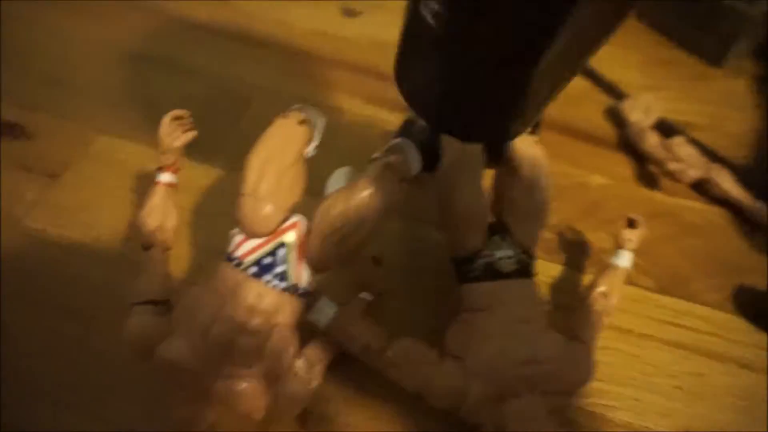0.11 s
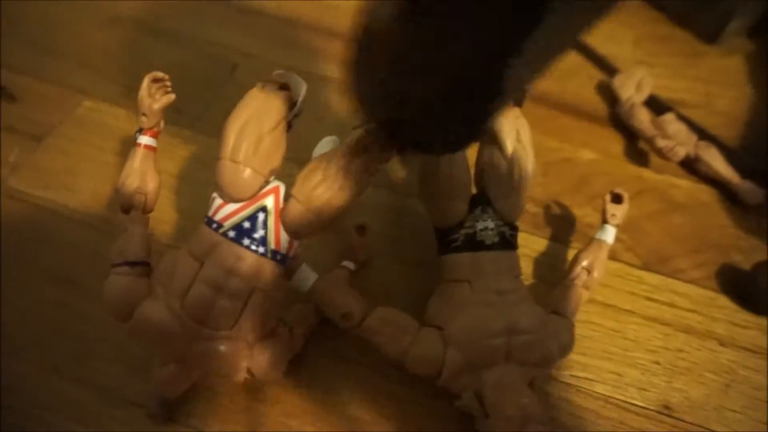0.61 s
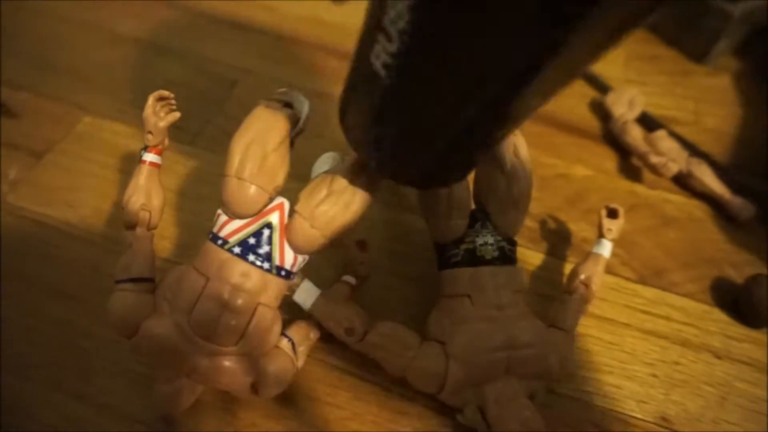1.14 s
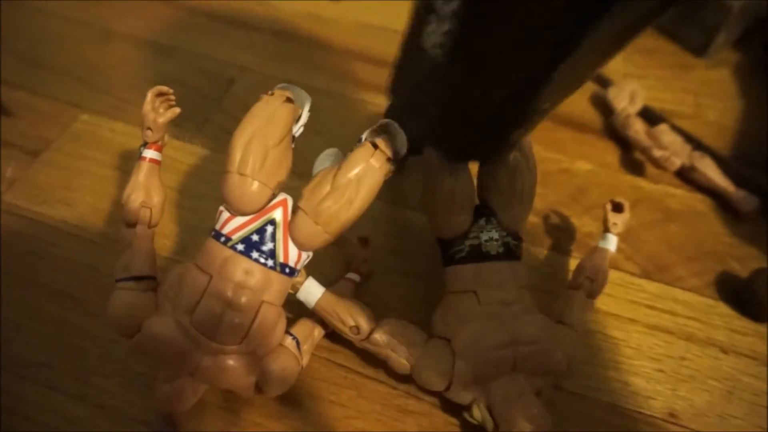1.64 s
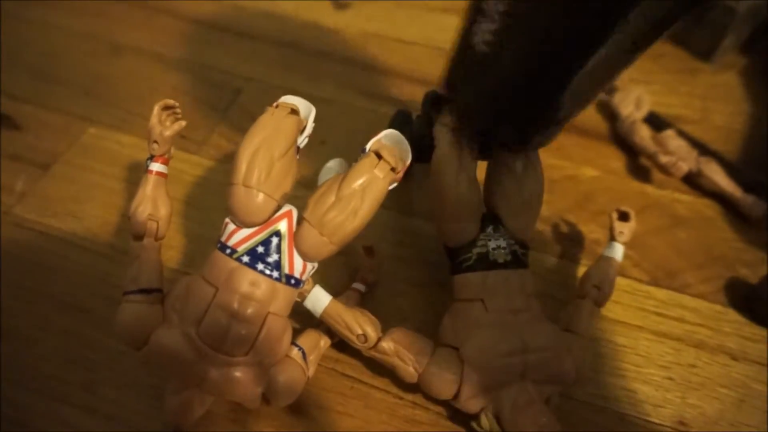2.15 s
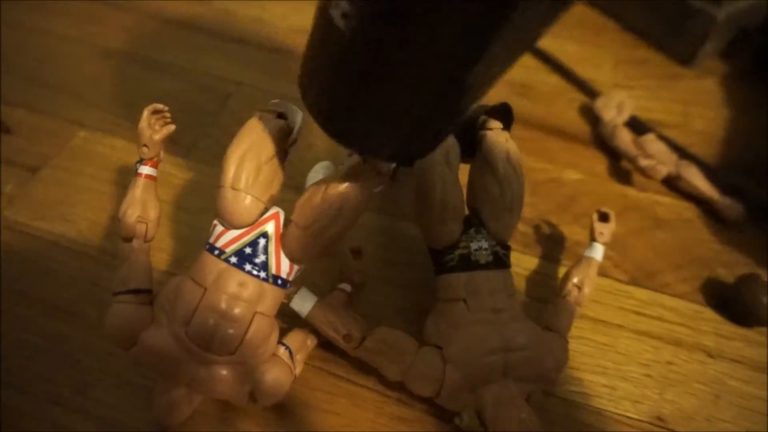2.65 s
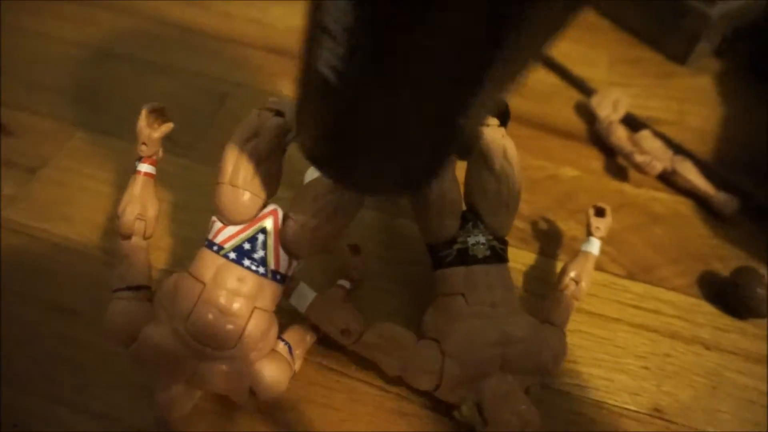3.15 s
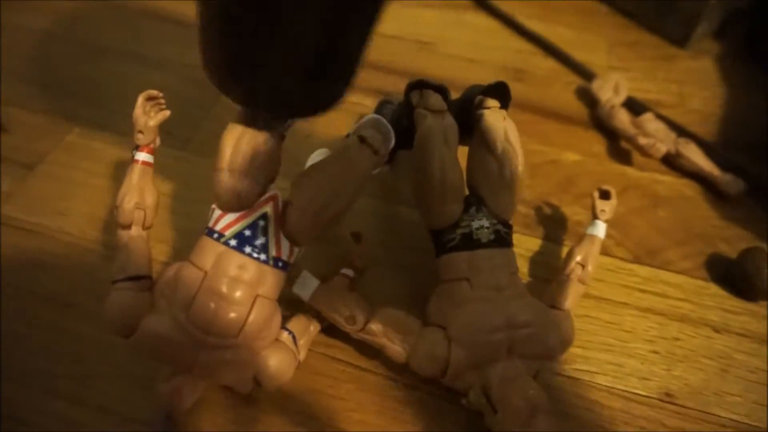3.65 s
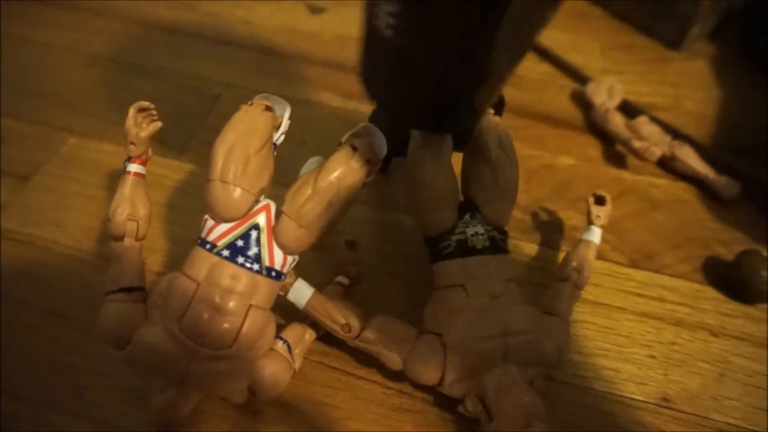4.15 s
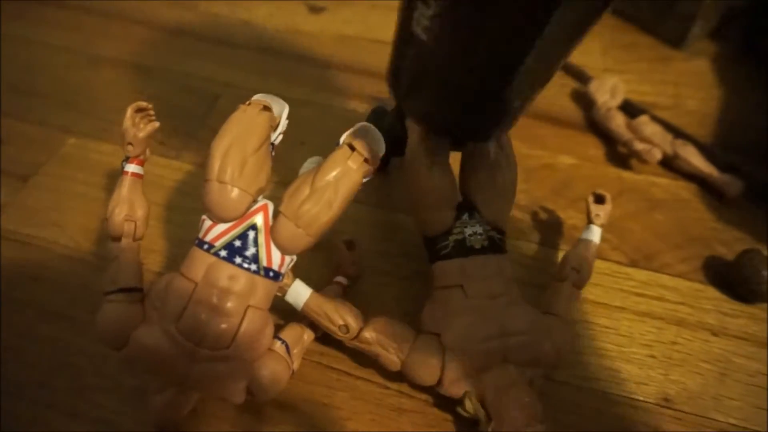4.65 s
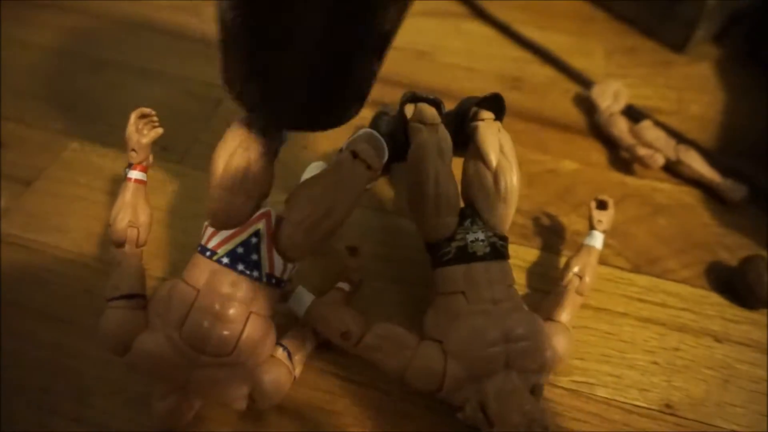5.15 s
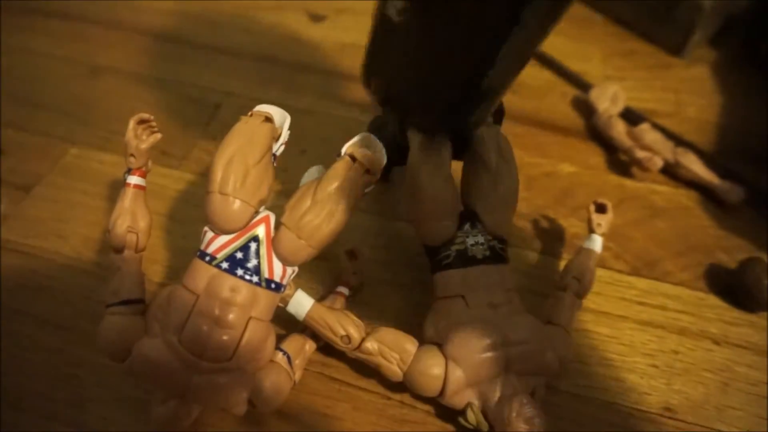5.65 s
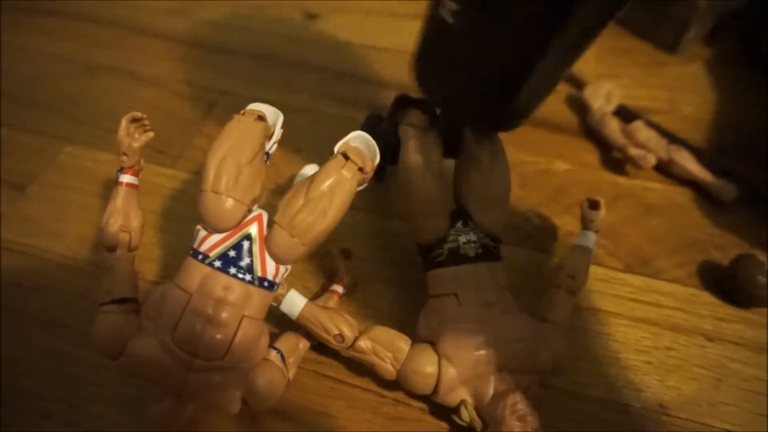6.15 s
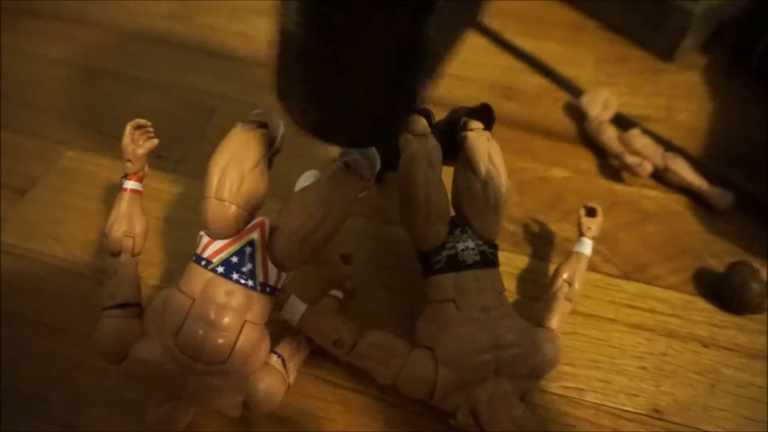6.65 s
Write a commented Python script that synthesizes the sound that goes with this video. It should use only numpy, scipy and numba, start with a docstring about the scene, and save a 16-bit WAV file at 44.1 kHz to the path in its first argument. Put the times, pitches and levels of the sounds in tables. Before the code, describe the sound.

A handheld hair dryer runs steadily up close, a loud rush of air over an even motor whine, gently fluttering as it is waved about.

```python
"""A hand-held hair dryer is waved over a wooden floor just in front of a stereo microphone pair.
Its rush is turbulent noise, filtered by the resonances of the barrel and split into gusting half-octave bands.
Two narrow bands of noise ring at the nozzle; sines at multiples of the shaft speed make the whine of
shaft and five fan blades, and steady sines a faint hum. Short echoes of the air come from nearby surfaces.
As the hand sweeps, level, brightness, the nozzle resonance and the side it is heard from all drift."""
import sys
import numpy as np
from scipy import signal
from scipy.fft import rfft, irfft, next_fast_len
from scipy.io import wavfile
from scipy.ndimage import uniform_filter1d, map_coordinates
from numba import njit

SR = 44100
rng = np.random.default_rng(int(sys.argv[2]) if len(sys.argv) > 2 else 0)


def level_to_linear(level):
    """Convert decibel levels to linear amplitude factors, elementwise."""
    exponent = np.asarray(level, float) / 20
    return 10 ** exponent


def wav_out(sig):
    """Save sig, one row per channel (or a flat mono array), as 16-bit PCM at SR to the path in sys.argv[1]."""
    wavfile.write(sys.argv[1], SR, np.round(np.clip(np.atleast_2d(sig).T, -1, 1) * 32767).astype(np.int16))


N = 298557  # samples
LEFT_RIGHT = np.array([[1], [-1]])  # sign of a difference in the left and the right channel


def level(x, db):
    """Root-mean-square normalisation: scale to an rms level in dB."""
    return x * level_to_linear(db) / np.sqrt(np.mean(x ** 2))


def curve(table):
    """Linear interpolation in time: each column after the seconds becomes one value a sample."""
    seconds, *columns = np.transpose(table)
    time = np.arange(N) / SR
    return [np.interp(time, seconds, column) for column in columns]


def along(table, hz):
    """Interpolation on a logarithmic frequency axis of an (Hz, value) table."""
    table_hz, value = np.transpose(table)
    return np.interp(np.log(hz + 1), np.log(table_hz + 1), value)


def bumps(table):
    """Superposition of smooth flat-topped swells from (middle s, length s, dB) rows."""
    time = np.arange(N) / SR
    return sum(db * np.exp(-(2 * np.abs(time - middle) / length) ** 3) for middle, length, db in table)


def walk(rate_hz):
    """Band-limited random drift: levels drawn rate_hz times a second, averaged twice; spread near 1."""
    hold = int(SR / rate_hz)
    steps = np.repeat(rng.standard_normal(N // hold + 1), hold)
    return 1.38 * uniform_filter1d(uniform_filter1d(steps, hold), hold)[:N]


@njit
def svf(x, hz, width):
    """State-variable resonator: a band-pass with a moving centre, gain 1 there."""
    out, band, low = np.empty(len(x)), 0., 0.
    for i in range(len(x)):
        g, damping = np.tan(np.pi * hz[i] / SR), width / hz[i]
        v = (band + g * (x[i] - low)) / (1 + g * (g + damping))
        band, low, out[i] = 2 * v - band, low + 2 * g * v, damping * v
    return out


def flutter():
    """Narrow-band modulation: an uneven wobble around 8.5 Hz, 9.5 Hz wide, with a spread of 1."""
    return level(svf(rng.standard_normal(N), np.full(N, 8.5), 9.5), 0)


# Steady hum tones. Each row: frequency in Hz, mean level in dB rms.
HUM_TONES = [(110.1, -64.5), (240.2, -66.5), (439.8, -51)]


def hum():
    """Pure tones of fixed frequency, slowly wavering in level and the same in both channels."""
    time = np.arange(N) / SR
    out = 0
    for hz, db in HUM_TONES:
        out = out + np.sqrt(2) * level_to_linear(db + 1.1 * walk(1.53)) * np.sin(2 * np.pi * hz * time)
    return out


# Reflections from floor, hands and furniture nearby. Each row: mean delay in ms,
# level in dB against the treble of the direct sound.
ECHOES = [(1.2, -16), (2.3, -18), (3.4, -14.5), (4.7, -18.5), (6.4, -19.5), (7.9, -22)]


def nearby(x):
    """Comb filtering: short echoes whose paths stretch as the dryer moves shift a fine treble ripple."""
    # small objects return only the short wavelengths
    high_pass = signal.butter(4, 3700, "high", fs=SR, output="sos")
    treble = signal.sosfilt(high_pass, x.mean(axis=0))
    out = x.copy()
    for delay_ms, db in ECHOES:
        lag = (delay_ms + 0.072 * walk(2.5)) * SR / 1000
        out += level_to_linear(db) * map_coordinates(treble, [np.arange(N) - lag], order=2, mode="mirror")
    return out


# Pitch of the upper nozzle ring. Each row: time in seconds, frequency in Hz.
RING_PITCH = [(0, 6200), (3, 6280), (5.4, 6060), (5.7, 6020), (6.1, 6220), (6.77, 5870)]
# Times at which the gap to the floor suits the ring. Each row: middle in seconds, length in seconds, lift in dB.
RING_LIFT = [(2.0, .5, 5), (3.1, .9, 9), (6.0, 1.3, 13)]


def ring(noise, hz):
    """Resonance: two equal 450 Hz wide band-passes in series."""
    return svf(svf(noise, hz, 450.), hz, 450.)


def nozzle():
    """Resonance of air between nozzle and floor: two hisses rise together when the gap suits them."""
    rest_db = -1.5  # added to both hisses throughout
    out = 0
    for hz, db in [(curve(RING_PITCH)[0], -40), (np.full(N, 3880.), -42.5)]:
        shared, opposed = rng.standard_normal((2, N))
        hiss = ring(shared, hz) + .25 * LEFT_RIGHT * ring(opposed, hz)
        out = out + level(hiss, db)
    return out * level_to_linear(rest_db + bumps(RING_LIFT))


# Motor and fan tones. Each row: multiple of shaft speed, mean level in dB rms, left minus right in dB,
# phase by which left leads in radians.
WHINE_TONES = [(1, -30, 3.5, 0.29), (2, -36, -5, .17), (3, -34, .1, .12), (5, -33, -4, -.37),
               (8, -52, -3, .25), (15, -50, -1.2, -.1), (21, -47, -.6, -.3)]
# Fan speed. Each row: time in seconds, blade-passing frequency in Hz.
FAN_SPEED = [(0, 2649.5), (.35, 2649.6), (1.0, 2655.6), (1.35, 2654.9), (2.4, 2660.8), (3.3, 2649.5),
             (4.0, 2654.3), (4.4, 2651.7), (5.1, 2651.7), (5.75, 2656.6), (6.1, 2655.2), (6.4, 2659),
             (6.77, 2657)]
# Swing of the shaft tone, used about its mean. Each row: time in seconds, level in dB.
SHAFT_LEVEL = [(0.02, -30), (0.41, -35), (0.82, -31.5), (2.0, -35), (2.6, -33.5), (2.82, -30), (3.9, -32.5),
               (3.96, -36), (4.22, -31.5), (4.27, -34), (4.57, -32), (4.76, -37), (4.8, -35), (5.1, -31),
               (5.88, -36), (6.72, -31)]


def whine():
    """Harmonics of rotation: multiples of the shaft speed, the shaft tone swinging most in level."""
    blades, faint_db, upper_share = 5, -59, 0.25  # upper_share: how far the higher tones follow the shaft tone
    shaft_db = curve(SHAFT_LEVEL)[0]
    shaft_db = shaft_db - shaft_db.mean()
    shaft_hz = curve(FAN_SPEED)[0] / blades + 0.15 * walk(24.66)
    turns = np.cumsum(shaft_hz) / SR
    # faint tones fill in the other multiples from 6 to 28
    listed = np.round([row[0] for row in WHINE_TONES])
    faint = [(k, faint_db, 0, 0) for k in range(6, 29) if k not in listed]
    out = 0
    for multiple, db, pan_db, lead in list(WHINE_TONES) + faint:
        start_phase = rng.uniform(0, 2 * np.pi)
        tone = np.sin(2 * np.pi * round(multiple) * turns + LEFT_RIGHT * lead / 2 + start_phase)
        # shorter waves waver more as the paths shift
        waver_db = .45 * np.sqrt(multiple) * walk(3.)
        swing_db = shaft_db * (1 if multiple < 1.5 else upper_share)
        out = out + np.sqrt(2) * level_to_linear(db + LEFT_RIGHT * pan_db / 2 + waver_db + swing_db) * tone
    return out


# Slow drift of the rush. Each row: time in seconds, body in dB, treble in dB, left minus right of the treble in dB.
DRIFT = [(0, 0.5, -0.5, 0), (.5, 0.8, -.6, -3.5), (.85, 0.4, -1.0, -1), (1.3, 0.8, -0.9, -1.5),
         (1.7, 1, 0.1, -1.8), (2.05, -0.2, 0, -2), (2.4, -0.3, -.8, -1.8), (2.95, 2.1, 0.6, -1),
         (3.3, 0.5, -.6, -0.5), (3.68, 1.1, .6, 0.5), (4.1, 0.2, 0.8, -0.7), (4.51, 1.5, 1.6, -0.8),
         (4.7, -0.1, 1.1, -1.2), (5.1, 0.8, -0.1, 1.1), (5.55, -.7, -0.4, -0.3), (6.1, 0.1, 1.0, -0.8),
         (6.4, 1, .9, -1), (6.77, 1.7, 1, .5)]
# Brief dips in level of the whole rush. Each row: middle in seconds, length in seconds, depth in dB for the body.
DIPS = [(.28, .1, -0.6), (.6, 0.065, -0.3), (1.93, 0.13, -0.9), (2.65, 0.05, -1.1), (3.19, 0.16, -1.5),
        (4.02, 0.14, -1), (4.75, 0.19, -1.1), (5.31, 0.08, -2), (6.27, 0.12, -2)]


def sweep():
    """Directivity of a moving source: levels of body and treble and the turn to the left, all in dB."""
    body_db, treble_db, turn_db = curve(DRIFT)
    dip_db = bumps(DIPS)
    # dips cut the treble deeper than the body
    return body_db + dip_db, treble_db + 1.48 * dip_db, turn_db


# Spectrum of the air without its resonances. Each row: frequency in Hz, relative density in dB per Hz.
AIR = [(20, -64), (100, -34.5), (320, -22), (370, -15.5), (830, -12.5), (1030, -7.5), (1750, -10.5),
       (3500, -13), (4700, -17.5), (6350, -20), (6700, -21), (12300, -21.5), (13100, -18), (15700, -20)]
# Barrel resonances and valleys. Each row: frequency in Hz, width in Hz, lift or dip in dB.
BARREL = [(482, 53, -2.5), (1080, 22, 5.5), (1177, 85, 7.5), (1360, 297, 7.5), (1578, 102, 4.5),
          (2086, 100, 4.5), (2317, 124, 5), (2560, 130, -2.5), (3020, 400, 6), (5640, 690, 7),
          (14600, 1200, 2.5)]
# Level difference of the microphone pair. Each row: frequency in Hz, left minus right in dB.
LEAN = [(60, 0.0), (110, 0.0), (200, 0.5), (380, 0.5), (700, 2.0), (1290, -0.5), (2380, -2.0), (4400, -2.0),
        (8120, -0.5), (15000, -0.5)]
# Phase difference of the microphone pair. Each row: frequency in Hz, phase by which left leads in radians.
LEAD = [(0, 0), (85, 0), (520, 0.2), (860, 0.1), (2240, 0.0), (2670, -0.2), (3360, 0.5), (3620, 0.0),
        (4650, 0.0), (8700, -0.2), (9650, -0.6), (11700, -0.5), (12700, -0.8), (13700, -0.8), (15500, -1.4)]
# Sound returned by floor and room. Each row: frequency in Hz, level in dB against the direct rush.
DIFFUSE = [(80, -47), (125, -23), (220, -27), (340, -60), (520, -11), (1300, -18.5), (2200, -12.5),
           (3100, -8.5), (4200, -5.6), (4450, -8), (5900, -15), (6900, -6.5), (7900, -9), (11000, -5),
           (14000, -9), (15600, -3)]
# Swell of the 3 kHz ring. Each row: time in seconds, level in dB.
RING_3K = [(0, 1.7), (.5, -1.5), (.87, 2.6), (1.3, -0.5), (2.7, -1), (3.1, 0.7), (3.7, 0.5), (4.4, -2.3),
           (5.3, 1.5), (6.2, -1.2), (6.77, 1)]


def rush(body_db, treble_db, turn_db):
    """Turbulence noise coloured by barrel resonance; half-octave bands gust together and flicker alone."""
    size = next_fast_len(N)
    hz = np.fft.rfftfreq(size, 1 / SR)
    barrel_db = sum(db / (1 + (2 * (hz - f) / width) ** 2) for f, width, db in BARREL)
    colour = level_to_linear(along(AIR, hz) + barrel_db)
    direct, diffuse = rfft(rng.standard_normal((2, size))) * colour
    pair = level_to_linear(LEFT_RIGHT * along(LEAN, hz) / 2) * np.exp(.5j * LEFT_RIGHT * along(LEAD, hz))
    parts = np.vstack([direct * pair, level_to_linear(along(DIFFUSE, hz)) * diffuse])
    ring_db = curve(RING_3K)[0]
    gust, out = flutter(), 0
    uneven_db = 5.0 * walk(8.)  # shared by the bands below 100 Hz
    for centre_hz in 23.5 * 2 ** np.arange(0, 9.6, .5):
        # neighbouring bands overlap and add up to one
        band = np.clip(1 - 2 * np.abs(np.log2((hz + 1) / centre_hz)), 0, 1)
        left, right, room = irfft(parts * band, size)[:, :N]
        # treble is directional: it follows the sweep, the turn and the gusts more than the body does
        share = np.clip(np.log2(centre_hz / 1160.0) / 2.3, 0, 1)
        swell_db = body_db + share * (treble_db - body_db + 0.46 * gust) + 0.37 * walk(9.)
        if centre_hz < 100:  # these bands swing unevenly in level
            swell_db = swell_db + uneven_db + 0.5 * body_db
        if 2800 < centre_hz < 3300:  # the 3 kHz ring swells and fades on its own
            swell_db = swell_db + ring_db
        if centre_hz > 13000:  # top hiss gains as the dryer turns left
            swell_db = swell_db + 2 * turn_db
        near = np.array([left, right]) * level_to_linear(LEFT_RIGHT * share * turn_db / 2)
        # the returned sound has opposite signs in the channels and falls as the dryer turns left
        returned = LEFT_RIGHT * room * level_to_linear(-1.8 * share * turn_db)
        out = out + level_to_linear(swell_db) * (near + returned)
    return level(out, -13)


def scene():
    """Superposition of sources: air with its echoes, whine and hum, the air swinging with the hand."""
    body_db, treble_db, turn_db = sweep()
    air = rush(body_db, treble_db, turn_db) + nozzle() * level_to_linear(treble_db)
    air = air * level_to_linear(0.5 * flutter())  # the air stream wobbles in level
    return nearby(air) + whine() + hum()


def top_cut(x):
    """Nothing passes above the cut-off."""
    return signal.sosfilt(signal.butter(12, 15970, fs=SR, output="sos"), x)


def record(dry):
    """Band limiting and clipping: a steep low-pass at 15725 Hz, then peaks held to full scale."""
    low_pass = signal.ellip(14, .5, 80, 15725, fs=SR, output="sos")
    mix = np.clip(signal.sosfilt(low_pass, dry), -1, 1)
    return top_cut(mix)


dry = scene()
out = record(dry)
wav_out(out)
```